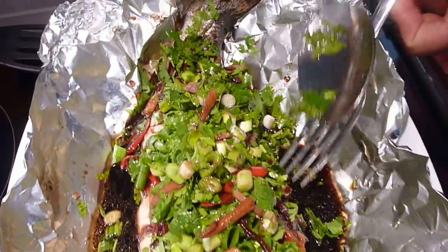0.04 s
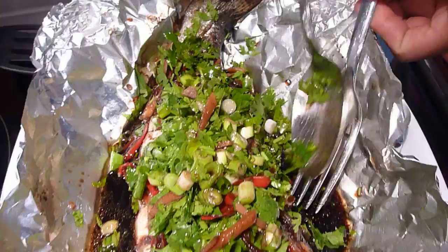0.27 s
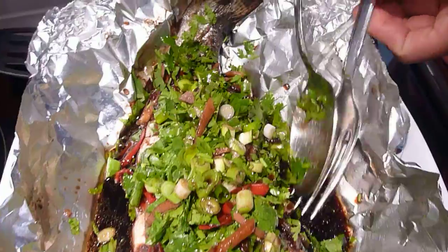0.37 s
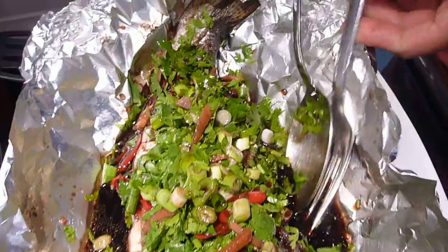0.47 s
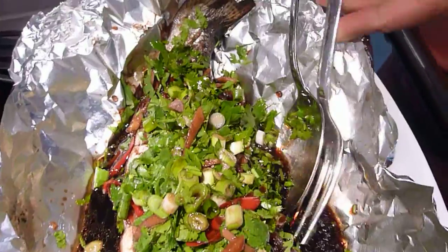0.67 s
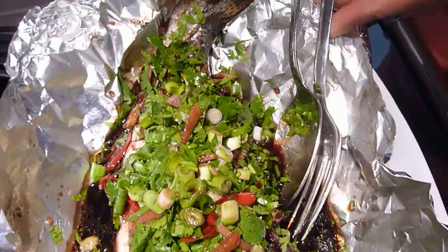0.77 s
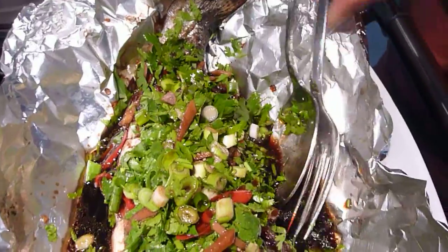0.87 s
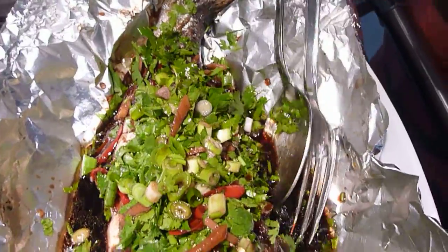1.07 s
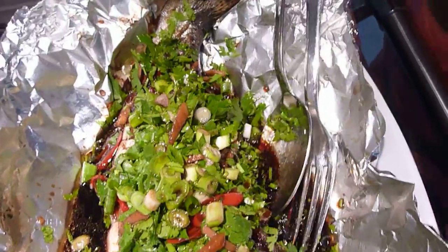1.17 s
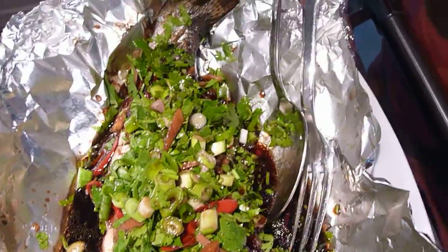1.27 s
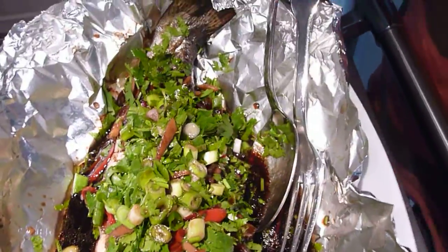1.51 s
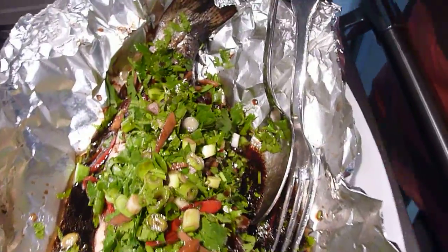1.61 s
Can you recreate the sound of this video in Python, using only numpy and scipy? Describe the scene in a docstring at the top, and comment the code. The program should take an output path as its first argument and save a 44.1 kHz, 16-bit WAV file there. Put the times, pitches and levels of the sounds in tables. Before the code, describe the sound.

Aluminium foil crinkles close by as a fork and spoon press into it. After a few faint ticks, short steel clinks and crisp crackles come at about 0.2 to 0.3 seconds. Uneven crackling and fine rustling continue, ease briefly around 0.8, then peak with another light clink at 0.9. The crinkling fades by 1.3 seconds, leaving the faint, steady rush of the kitchen.

```python
"""Cutlery on aluminium foil

A fork and a spoon are pushed in beside a cooked fish that lies in foil, close by in a kitchen.
The steel clinks and rings in its modes until the food damps it. Under its pressure, creases in the
foil snap through one by one, and tiny wrinkles give way in a fine rustle.
A steady low rush of the room lies underneath."""
import sys
import numpy as np
from scipy import signal
from scipy.fft import rfft, irfft
from scipy.io import wavfile

SR = 44100
rng = np.random.default_rng(int(sys.argv[2]) if len(sys.argv) > 2 else 0)


def transcribe(u):
    """Save the signal u as a 16-bit wav file named by the first command-line argument.

    u: samples, shape (n,) or (channels, n), limited to [-1, 1]; the rate is SR.
    q: integer samples, one column per channel.
    """
    v = np.clip(np.atleast_2d(u).T, -1, 1)
    q = np.round(v * 32767).astype(np.int16)
    wavfile.write(sys.argv[1], SR, q)


N = 72765

# modes of each steel part: f/Hz, relative level/dB, T60/s
FORK = [(1920, -4, 0.077), (2420, -15.5, 0.19), (4110, -8, 0.21), (4556, -4.5, 0.26), (4930, -11.5, .25),
        (5480, -4.5, 0.17), (7364, -19, .16)]
SPOON = [(3210, -5, 0.11), (4050, -18, 0.38), (5630, -22, .25), (6200, -12.5, 0.17), (6165, -1, 0.34),
         (7800, -14.5, 0.11), (8240, -12, .12)]
TINES = [(719, -9, .15), (2350, -2, 0.13), (2627, -15.5, .3), (3018, 0.5, 0.069), (4530, -13, .08),
         (5400, 1, 0.064), (6627, -14.5, 0.076), (7208, -6.5, 0.13)]


def from_db(db):
    """Amplitude ratio of a level: a factor of ten for every 20 dB."""
    return 10 ** (np.asarray(db) / 20)


def unit_energy(x):
    """Normalisation: the squared samples sum to one."""
    return x / np.sqrt(np.sum(x ** 2) + 1e-20)


def envelope(points):
    """Amplitude envelope, interpolated in decibels between (t/s, level/dB) points."""
    return from_db(np.interp(np.arange(N) / SR, *np.transpose(points)))


def gain_at(points, hz):
    """Magnitude response, interpolated in log frequency between (f/Hz, level/dB) points."""
    f, db = np.transpose(points)
    return from_db(np.interp(np.log(np.maximum(hz, 1)), np.log(f), db))


def colour(x, points):
    """Zero-phase filtering: the spectrum is multiplied by a magnitude response."""
    hz = np.arange(N + 1) * SR / (2 * N)
    return irfft(rfft(x, 2 * N) * gain_at(points, hz))[:N]


def resonate(x, hz, q):
    """Second-order resonator with unit gain at its peak."""
    return signal.lfilter(*signal.iirpeak(min(hz, SR / 4), max(q, 1), fs=SR), x + 1e-18)


def add(track, onset_s, sound):
    """Superposition: a sound adds to the track from its onset."""
    start = max(int(onset_s * SR), 0)
    track[start:start + len(sound)] += sound[:max(N - start, 0)]


def room_rush():
    """Background noise: a continuous spectrum with three faint spectral lines of hum."""
    # spectral density of the rush: f/Hz, relative level/dB
    spectrum = [(25, -37.5), (50, -38.5), (80, -26.5), (130, -14), (230, -3), (400, 2.5), (950, -0.5),
                (1800, -5.5), (2500, -6.5), (4200, -8.5), (5500, -10.5), (7200, -13), (9000, -19)]
    # its course in time: t/s, rms level/dB
    levels = [(0, -48.5), (.2, -49), (.32, -51.5), (1.3, -51), (1.45, -50.5), (1.65, -51.5)]
    # steady tones: f/Hz, rms level/dB
    tones = [(517, -71.5), (1487, -68.5), (1992, -71.5)]
    t = np.arange(N) / SR
    air = np.sqrt(N) * unit_energy(colour(rng.standard_normal(N), spectrum))
    hum = sum(np.sqrt(2) * from_db(db) * np.sin(2 * np.pi * (hz * t + rng.random())) for hz, db in tones)
    return envelope(levels) * air + hum


def foil_rustle(crackles_per_s=3500, spread_db=2, q=7.65, bands=24):
    """Shot noise: wrinkles give way at random and ring for a few cycles, louder under pressure."""
    # rustle as the cutlery presses: t/s, rms level/dB
    levels = [(0, -61.5), (.15, -56), (.22, -44.5), (.36, -45), (.43, -46.5), (0.471, -38), (.5, -44),
              (.68, -41.5), (.79, -52), (0.861, -52), (.91, -35.5), (.98, -48), (1.05, -44.5), (1.14, -43),
              (1.22, -51), (1.29, -68), (1.65, -81)]
    # weighting of the wrinkle resonances: f/Hz, relative level/dB
    spectrum = [(500, -2), (1000, -7), (2200, -3.5), (3700, -1), (5500, -6.5), (8000, -15)]
    gives_way = rng.random(N) < crackles_per_s / SR
    sizes = from_db(spread_db * np.minimum(rng.exponential(1, N), 4))
    impulses = gives_way * sizes * rng.choice([-1, 1], N)
    band = rng.integers(0, bands, N)
    crackles = sum(gain_at(spectrum, hz) * resonate(impulses * (band == k), hz, q)
                   for k, hz in enumerate(np.geomspace(550, 8000, bands)))
    return np.sqrt(N) * unit_energy(crackles) * envelope(levels)


def crease_snaps(flutter_db=6, unpitched_db=-6.5):
    """Snap-through buckling: each crease cracks and flutters, exciting the two facets beside it."""
    # snaps: t/s, lower facet f/Hz, level/dB, upper facet f/Hz, level/dB, Q, flutter T60/ms
    creases = [(0.038, 2300, -42, 3850, -33, 1.45, 13), (0.1642, 900, -40.5, 4000, -41.5, 2.5, 23),
               (0.182, 780, -36, 4340, -37, 1.7, 24), (0.2018, 3220, -22, 6200, -17, 2.7, 20),
               (0.2669, 4200, -31.5, 6900, -24, 1.6, 16), (0.277, 3340, -22, 5400, -23, 6.5, 11),
               (0.3373, 3680, -39, 5530, -31.5, 9.0, 21), (0.344, 2350, -43, 5370, -29, 13, 17),
               (0.4009, 2420, -35, 3440, -28.5, 12, 21), (0.4537, 1600, -40, 3880, -27, 3.1, 19),
               (0.4666, 1970, -39, 3600, -30.5, 12, 24), (0.5131, 1340, -28, 2260, -28.5, 3.1, 20),
               (0.5359, 4100, -34, 6050, -22.5, 10, 20), (0.561, 2320, -30, 3700, -48, 11, 24),
               (0.569, 3770, -22.5, 6250, -23.5, 15, 11), (0.6067, 3650, -29, 6080, -26, 8.6, 24),
               (0.6146, 3370, -28, 5100, -33, 5.0, 14), (0.6392, 1820, -25, 3870, -26.5, 2.3, 12),
               (0.6421, 1730, -26.5, 3850, -23.5, 1.2, 14), (0.6564, 1440, -34.5, 3530, -23.5, 2.5, 16),
               (0.6602, 3580, -29.5, 6300, -33, 6.2, 13), (0.6825, 1800, -36, 5350, -29.5, 3.1, 24),
               (0.696, 2270, -29.5, 3400, -25.5, 13, 19), (0.705, 3390, -28, 5600, -38.5, 12, 8),
               (0.7076, 2230, -27.5, 6250, -23, 11, 12), (0.8221, 2450, -33.5, 5500, -36.5, 3.8, 19),
               (0.8364, 3440, -40, 5300, -41.5, 8.5, 19), (0.8503, 2250, -40, 3600, -29, 7.5, 15),
               (0.8703, 3350, -27, 6700, -44.5, 6.3, 18), (0.88, 1800, -28.5, 3420, -24, 2.3, 23),
               (0.8843, 1650, -25.5, 4700, -26.5, 1.7, 15), (0.895, 2040, -31, 3800, -36, 4.5, 17),
               (0.9004, 1220, -30.5, 4870, -19.5, 2.1, 12), (0.9029, 2810, -26, 5470, -27, 7.8, 8),
               (0.923, 3600, -16.5, 5350, -22, 4.3, 15), (0.9356, 3570, -37, 6700, -35.5, 3.3, 10),
               (0.9964, 4130, -27.5, 5640, -35, 10, 18), (1.006, 1860, -35, 4250, -42, 2, 17),
               (1.0276, 1025, -40, 3540, -25.5, 5.3, 21.5), (1.098, 2690, -37.5, 5340, -39.5, 3.1, 24),
               (1.1155, 1170, -37.5, 3600, -32.5, 2, 24), (1.1301, 4830, -23.5, 5410, -19.5, 11, 14),
               (1.1938, 2620, -43.5, 4140, -38.5, 5.3, 24), (1.2174, 2000, -38, 3400, -50, 4.4, 24),
               (1.243, 4330, -43.5, 5130, -46, 22, 24)]
    out, t = np.zeros(N), np.arange(SR // 20) / SR
    highpass = signal.butter(2, 600, "high", fs=SR, output="sos")
    reference = np.sqrt(.0034 * SR / 2)   # 0 dB has the energy of a unit sine lasting 3.4 ms
    crack = t == 0
    for onset_s, low_hz, low_db, high_hz, high_db, q, t60_ms in creases:
        for hz, db in ((low_hz, low_db), (high_hz, high_db)):
            decay = from_db(-60 * t * 1e3 / t60_ms)
            flutter = from_db(flutter_db) * unit_energy(rng.standard_normal(len(t)) * decay)
            burst = resonate(crack + flutter, hz, q=1)
            facet = unit_energy(resonate(burst, hz, q)) + from_db(unpitched_db) * unit_energy(burst)
            add(out, onset_s, from_db(db) * reference * unit_energy(signal.sosfilt(highpass, facet)))
    return out


def cutlery_clinks(damping_t60_s=0.091, radiation_hz=990):
    """Free vibration: the modes of struck steel decay exponentially, faster once the food damps them."""
    # impacts: t/s, part struck, level/dB, free ringing time/s
    impacts = [(0.2013, FORK, -25.5, 0.036), (0.2015, SPOON, -26, 0.0082), (.2220, SPOON, -29, 0.0088),
               (0.2765, SPOON, -24.5, 0.045), (0.2775, FORK, -37, .03), (0.345, FORK, -41, 0.034),
               (0.9005, TINES, -27.5, 0.041), (.9230, TINES, -38, 0.06)]
    out, t = np.zeros(N), np.arange(SR // 4) / SR
    for onset_s, modes, db, free_s in impacts:
        ring = sum(from_db(level - 60 * t / t60) * np.sin(2 * np.pi * hz * t) for hz, level, t60 in modes)
        damping_db = 60 * np.maximum(t - free_s, 0) / damping_t60_s
        add(out, onset_s, ring * from_db(db - damping_db))
    # thin steel radiates low frequencies poorly
    return signal.sosfilt(signal.butter(2, radiation_hz, "high", fs=SR, output="sos"), out)


def kitchen_reverberation(x, delay_s=.003):
    """Convolution with a decaying response: early reflections from foil and worktop, then the walls."""
    t = np.arange(SR // 2) / SR
    response = np.zeros(len(t))
    for t60_s, db in ((0.05, -10.5), (0.31, -12)):   # early reflections, diffuse tail
        decay = from_db(-60 * t / t60_s) * (t > delay_s)
        response += from_db(db) * unit_energy(rng.standard_normal(len(t)) * decay)
    return signal.fftconvolve(x, response)[:N]


def scene():
    """Direct sound, reflections of the snaps and clinks, and background noise superpose."""
    snaps, clinks = crease_snaps(), cutlery_clinks()
    reflections = kitchen_reverberation(snaps + from_db(-9) * clinks)
    return (snaps + clinks + reflections + foil_rustle() + room_rush())[None]


def record(dry, cutoff_hz=9020):
    """Frequency response of the microphone: two narrow dips and a dull treble, cut off steeply."""
    # broad response: f/Hz, level/dB
    response = [(100, 1.5), (6800, 0.5), (7700, -1), (8400, -9.5), (8900, -25.5), (9300, -37)]
    # dips: f/Hz, bandwidth/Hz
    notches = [(2885, 190), (8000, 1160)]
    x = colour(dry[0], response)
    for hz, width_hz in notches:
        x = signal.lfilter(*signal.iirnotch(hz, hz / width_hz, fs=SR), x)
    lowpass = signal.ellip(10, .2, 80, cutoff_hz, fs=SR, output="sos")
    return signal.sosfilt(lowpass, x)[None]


dry = scene()
out = record(dry)
transcribe(out)
```